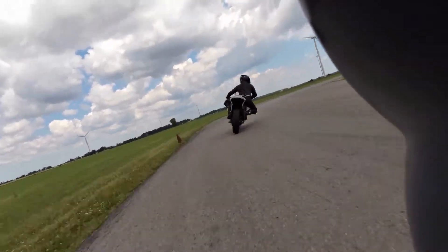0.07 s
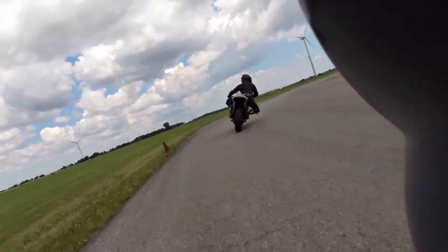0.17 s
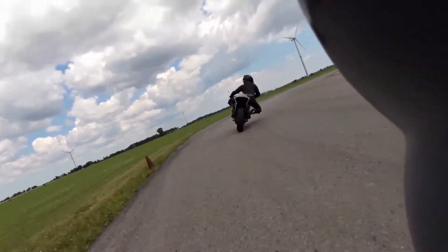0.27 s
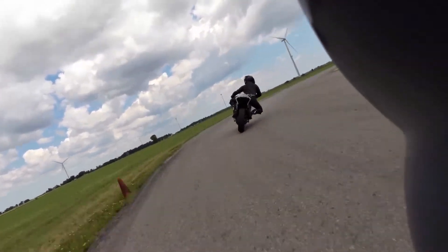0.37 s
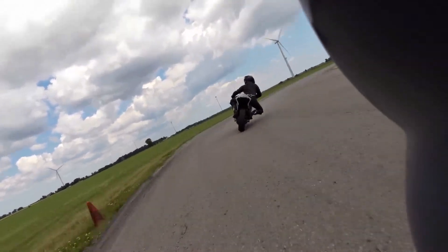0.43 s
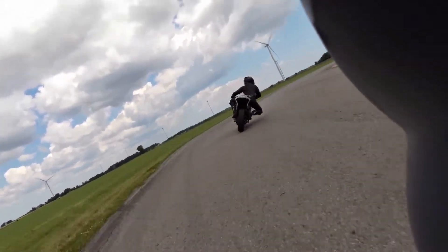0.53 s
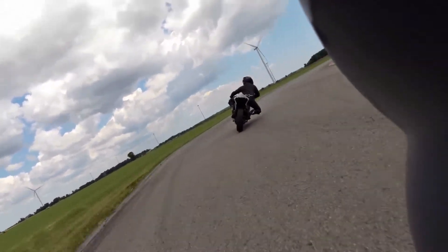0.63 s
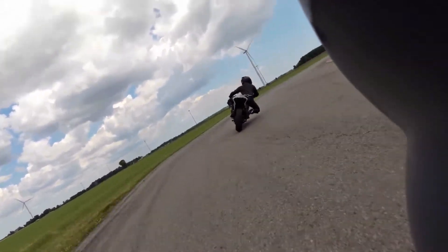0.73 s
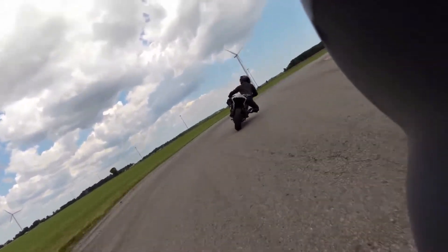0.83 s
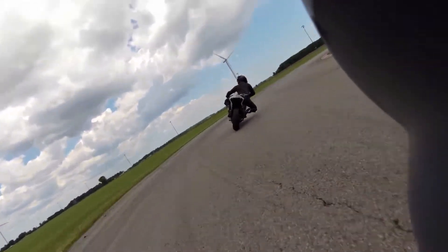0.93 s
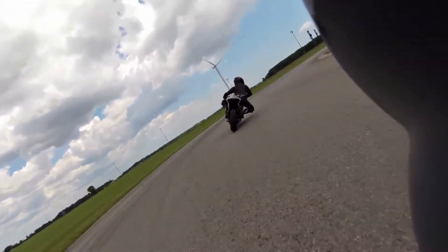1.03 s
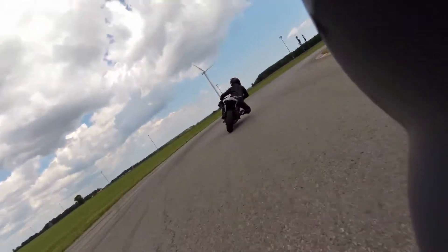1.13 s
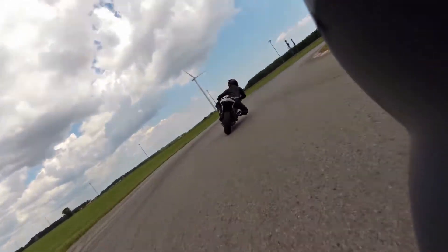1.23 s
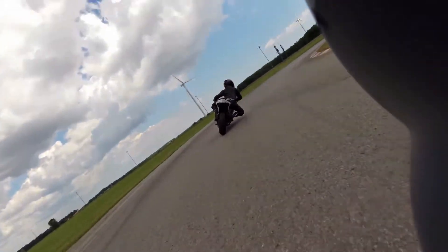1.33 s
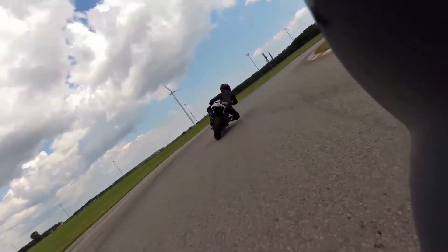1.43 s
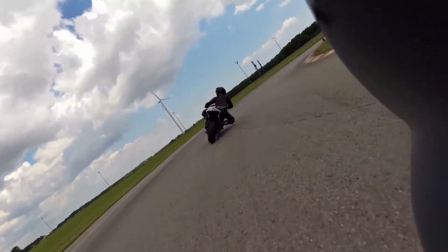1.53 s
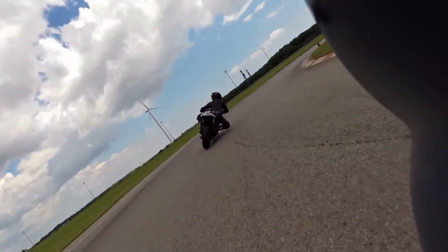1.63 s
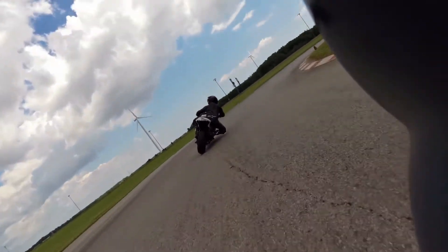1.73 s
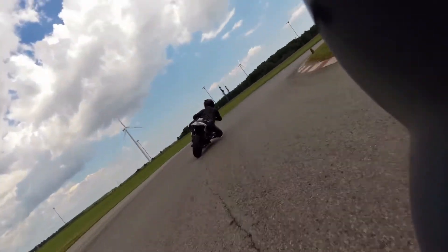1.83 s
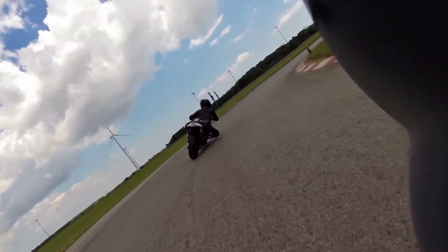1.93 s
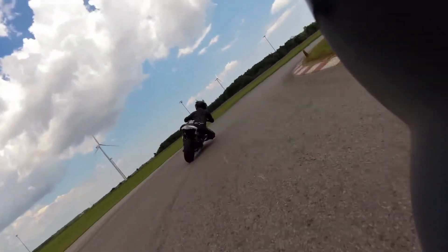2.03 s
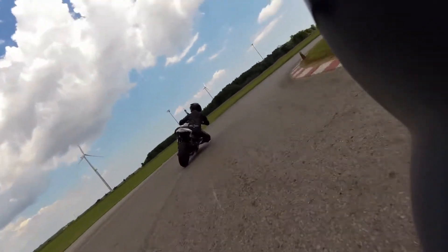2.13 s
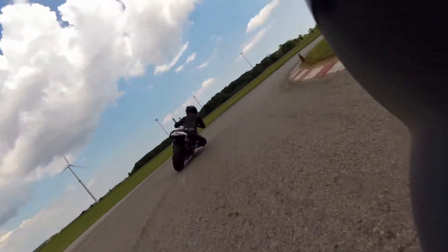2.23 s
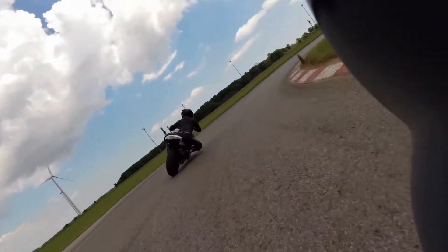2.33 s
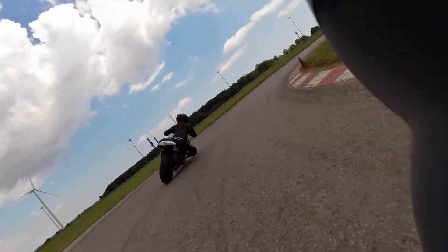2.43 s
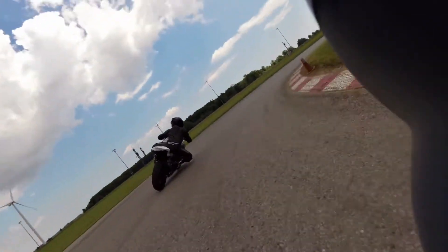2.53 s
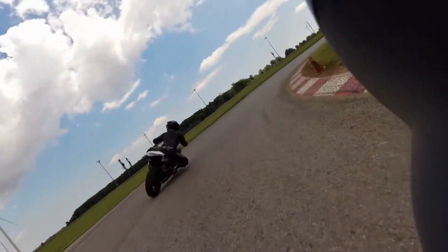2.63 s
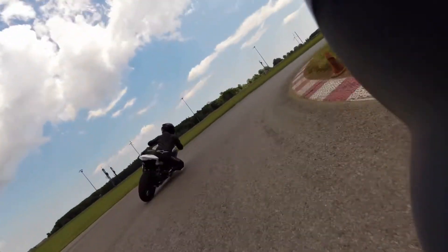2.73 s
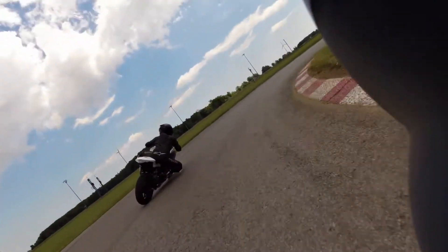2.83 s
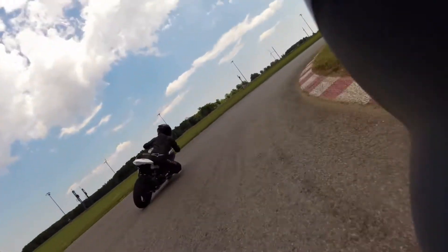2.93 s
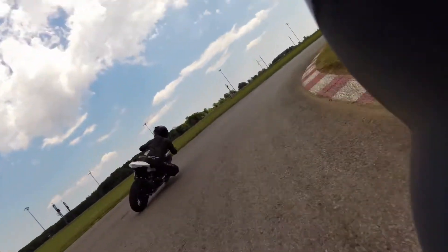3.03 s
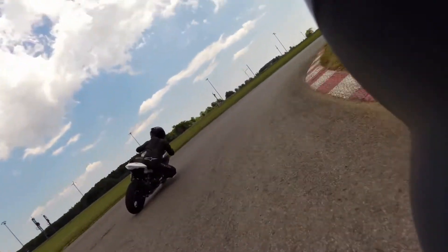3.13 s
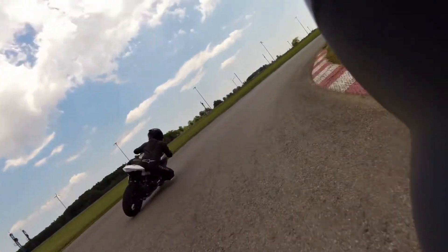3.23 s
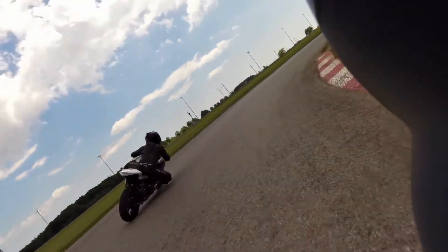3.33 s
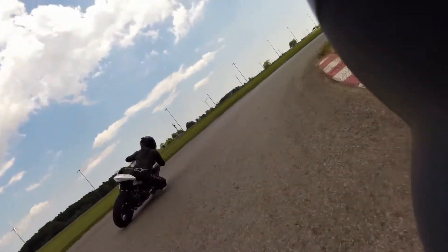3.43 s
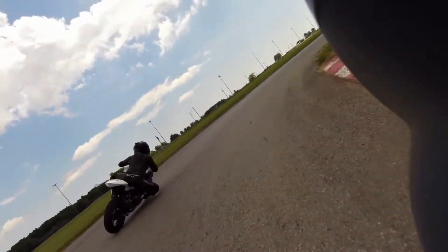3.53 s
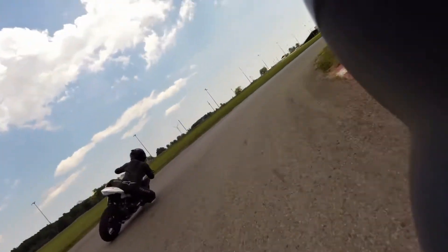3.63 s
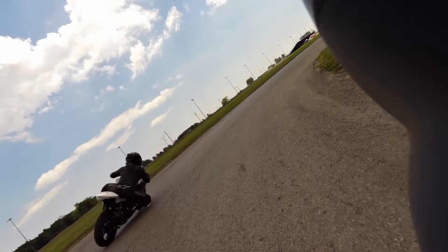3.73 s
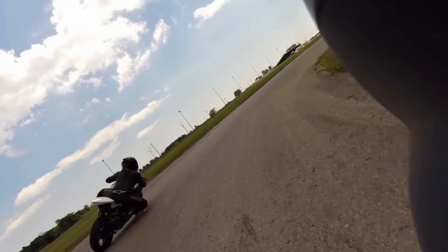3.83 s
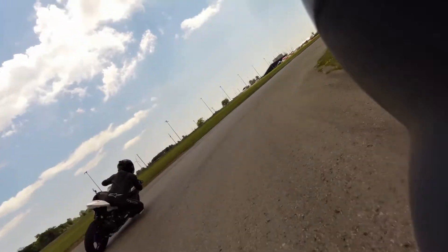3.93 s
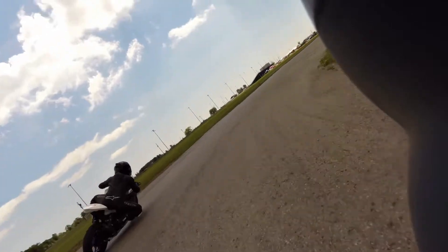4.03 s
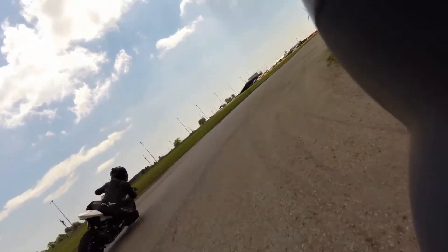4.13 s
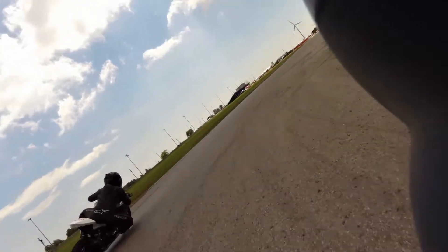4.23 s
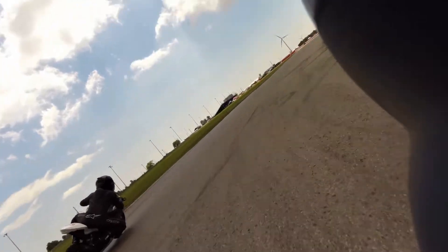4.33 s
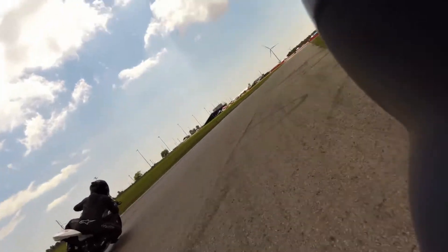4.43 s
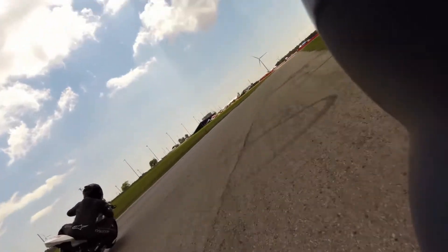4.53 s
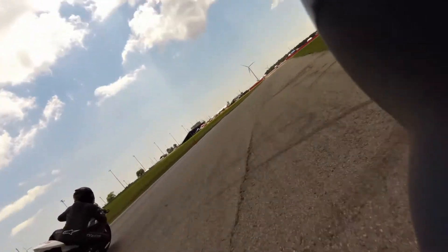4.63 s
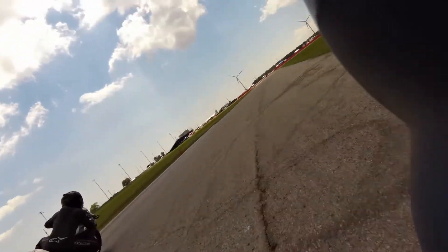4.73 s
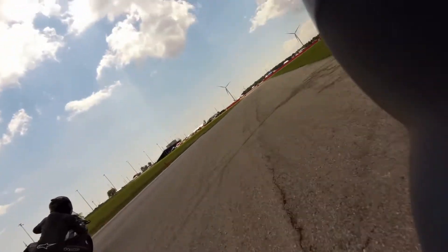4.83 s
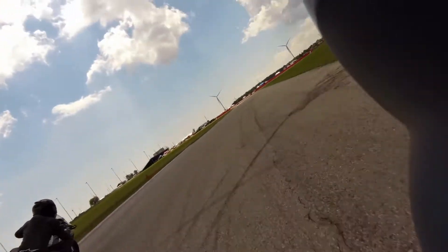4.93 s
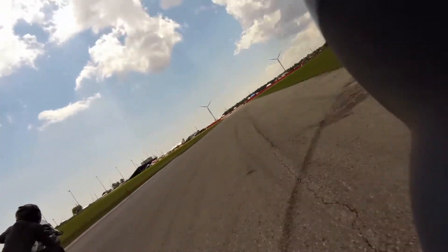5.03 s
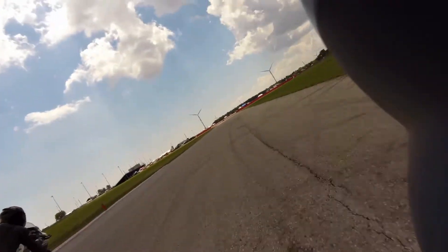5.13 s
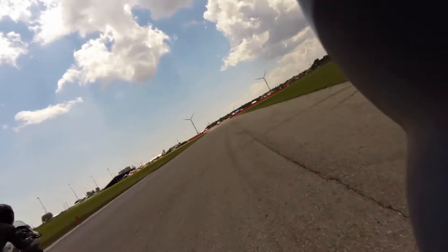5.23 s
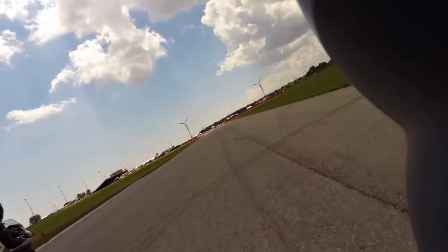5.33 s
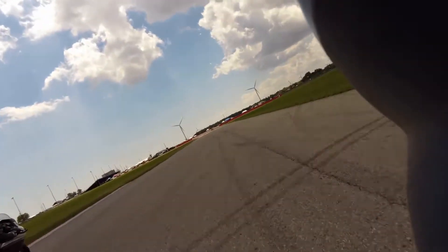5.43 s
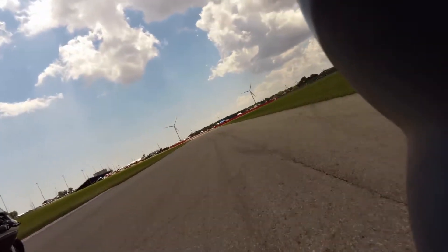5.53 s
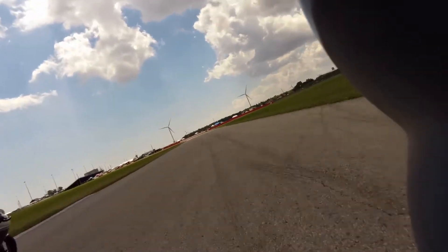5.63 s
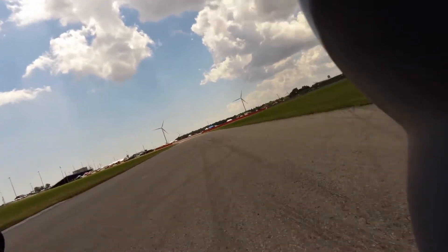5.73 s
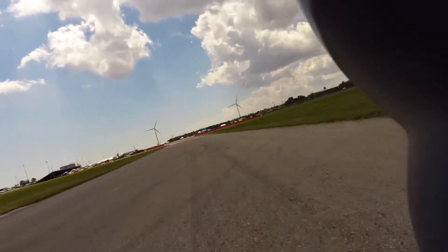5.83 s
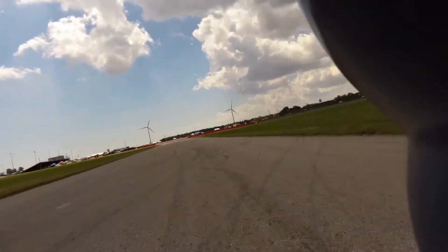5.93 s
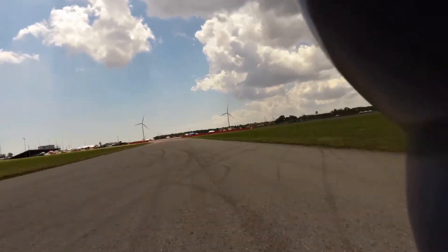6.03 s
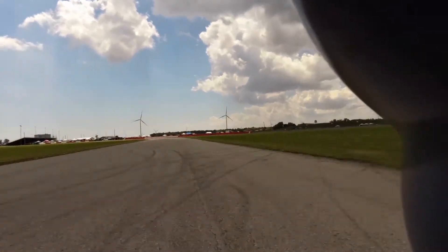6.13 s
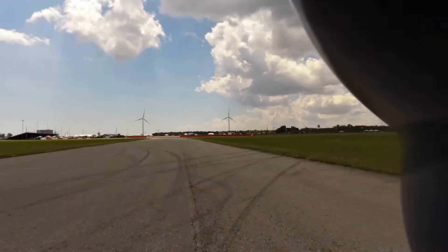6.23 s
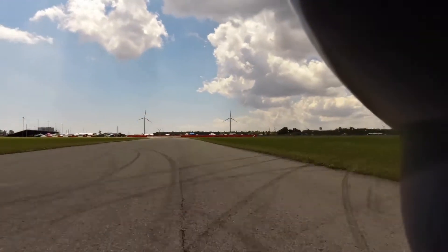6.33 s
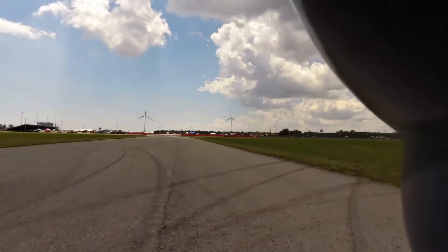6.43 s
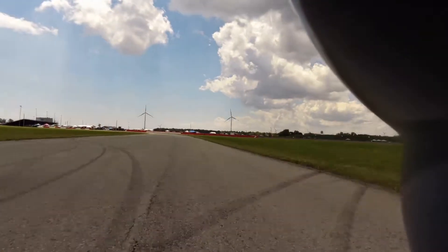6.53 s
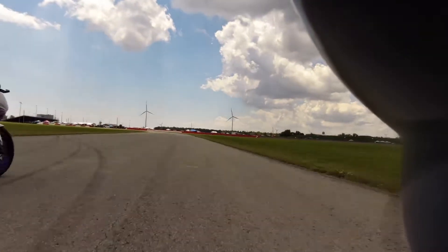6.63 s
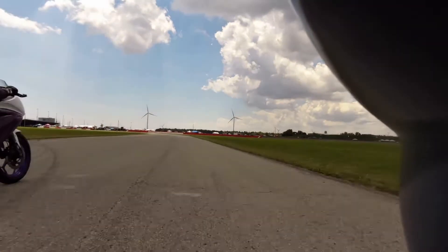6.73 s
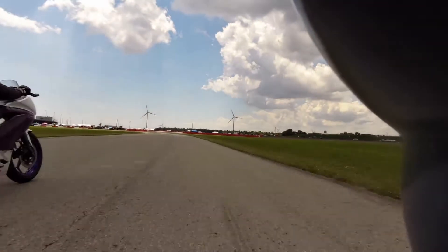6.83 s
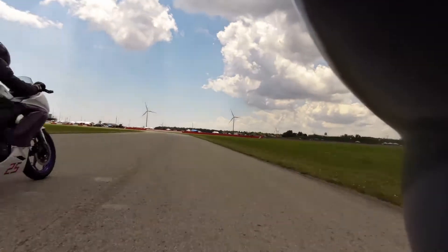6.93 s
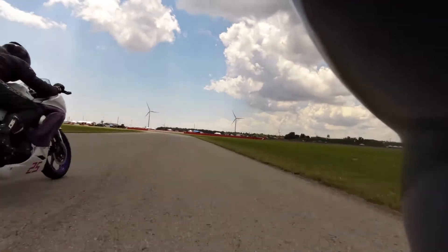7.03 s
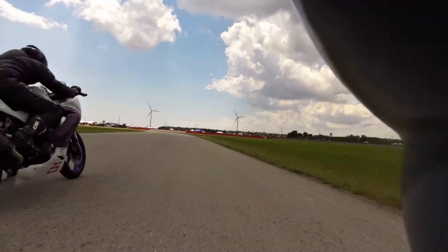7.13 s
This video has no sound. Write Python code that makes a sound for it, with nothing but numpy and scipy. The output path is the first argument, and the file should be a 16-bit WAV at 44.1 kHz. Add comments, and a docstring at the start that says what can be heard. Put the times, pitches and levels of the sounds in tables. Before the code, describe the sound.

A sport motorcycle drones and buzzes into a bend, eases off burbling, then accelerates with a rising howl through growing wind as another bike pulls alongside.

```python
"""Sport bike through a long bend

A four-cylinder sport bike rolls off into a bend and accelerates out of it, heard on its fairing.
Engine, intake and gears are sums of tones locked to the firing rate and shaped by resonances.
The microphone housing buzzes in struck resonances, bumps knock its mount, and a second bike pulls alongside.
Coloured noise makes road rumble and growing wind; pressure crests add a ticking rasp."""
import sys
import numpy as np
from scipy import signal
from scipy.fft import rfft, irfft, next_fast_len
from scipy.io import wavfile
from scipy.ndimage import uniform_filter1d

SR = 44100
rng = np.random.default_rng(int(sys.argv[2]) if len(sys.argv) > 2 else 0)


def to_wav(sig):
    """Store sig (one row per channel, or 1-D mono) as 16-bit WAV at the path in sys.argv[1].

    Samples outside -1..1 are clipped; the rate is SR.
    """
    pcm = np.clip(np.atleast_2d(sig), -1, 1) * 32767
    pcm = np.round(pcm).astype(np.int16)
    wavfile.write(sys.argv[1], SR, pcm.T)  # frames by channels


N = 316638
TIME = np.arange(N) / SR  # s
CRUISE_HZ = 230  # firing rate at which the buzz and howl levels are set
FRAME_LAG = .035  # further delay of each higher harmonic in the frame, share of a firing period


def from_db(db):
    """Decibels to gain."""
    return 10 ** (np.asarray(db) / 20)


def rms_one(x):
    """Scale to unit power."""
    return x / np.sqrt(np.mean(x ** 2) + 1e-20)


def in_time(rows):
    """Each column of a curve, interpolated at every sample."""
    s, *columns = np.transpose(rows)
    return [np.interp(TIME, s, c) for c in columns]


def drift(rate):
    """Slow random wander with spread 1: noise smoothed by two equal poles at rate [Hz]."""
    step = 40  # samples between control points
    r = np.exp(-2 * np.pi * rate * step / SR)
    settle = 2000  # control points dropped while the filter settles
    steps = rng.standard_normal(N // step + settle + 2)
    slow = signal.lfilter([1], [1, -2 * r, r * r], steps)[settle:]
    return np.interp(np.arange(N) / step, np.arange(len(slow)), rms_one(slow))


def noise(spectrum):
    """Noise of rms 1 coloured by (frequency [Hz], density [dB per Hz]), dropping away beyond the ends."""
    size = next_fast_len(N)
    hz, db = np.transpose(spectrum)
    bins = np.arange(size // 2 + 1) * SR / size + 1e-3
    gain = from_db(np.interp(np.log(bins), np.log(hz), db, left=-90, right=-90))
    white = rng.standard_normal(size)
    return rms_one(irfft(rfft(white) * gain, size)[:N])


def resonate(x, hz, width):
    """A two-pole resonance with gain 1 on top."""
    r = np.exp(-np.pi * width / SR)
    zeros = np.array([1, 0, -1]) * (1 - r * r) / 2
    poles = [1, -2 * r * np.cos(2 * np.pi * hz / SR), r * r]
    return signal.lfilter(zeros, poles, x + 1e-18)


def response(hz, resonances):
    """Power of a tone at hz through bell-shaped resonances (centre [Hz], width [Hz], level [dB])."""
    power = 0
    for centre, width, db in resonances:
        power = power + from_db(db) ** 2 * .5 ** ((2 * (hz - centre) / width) ** 2)
    return power


def line(turns, multiple, flutter, rate):
    """One tone locked to the turns, wavering in strength and phase."""
    angle = 2 * np.pi * multiple * turns
    in_phase = (1 + flutter * drift(rate)) * np.cos(angle)
    quadrature = flutter * drift(rate) * np.sin(angle)
    return np.sqrt(2) * (in_phase + quadrature)


def firing_levels(firing_hz, throttle, shut, bursts):
    """Nominal dB of each firing harmonic: it swells in body resonances and when the housing shakes."""
    # resonances of the bike: (centre [Hz], width [Hz], level [dB], gain at full throttle [dB])
    body_modes = [(168.7, 7.9, -8.5, -8), (190, 29, -33.5, 13.5), (222.1, 23.5, -7.5, -1.5),
                  (246, 49, -14.5, 2.5), (386, 63, -13.5, -18.5), (497.4, 70, -19.5, 5.5),
                  (599.6, 37.7, -12.5, -22), (775, 33, -35, 6), (827, 140, -19.5, -16.5)]
    # lift of firing harmonics 1 to 4 in a hard burst: (lift [dB] for each)
    shake_lift = (7.1, 3.6, 5.5, 6.6)
    full_shake_db = -24.5  # a burst this strong gives the whole lift
    floor_db, floor_db_per_octave = -32.5, -3.5  # harmonics away from any resonance
    shut_db = -11.5  # level change on a shut throttle

    body = [(hz, width, db + open_db * throttle) for hz, width, db, open_db in body_modes]
    shaking = uniform_filter1d(np.minimum(bursts / from_db(full_shake_db), 1), size=SR // 10)
    levels = []
    for k, lift_db in enumerate(shake_lift, 1):
        floor = from_db(floor_db + floor_db_per_octave * np.log2(k)) ** 2
        power = response(k * firing_hz, body) + floor
        levels.append(10 * np.log10(power) + shut_db * shut + lift_db * shaking)
    return levels


def engine(turns, harmonic_db, shut):
    """Firing harmonics, burbling on a shut throttle, with weak lines between as the cylinders differ."""
    # higher orders: (multiple of the firing rate, level against the nominal fourth harmonic [dB])
    overtones = [(5, -14), (6, -20), (7, -29)]
    # lines between harmonics: (multiple of the firing rate, level against the nominal third [dB])
    uneven_levels = [(.75, -20.5), (1.25, -19), (2.25, -20), (2.75, -23), (3.25, -18.5), (3.5, -27.5),
                     (3.75, -16), (4.25, -18.5), (4.5, -22), (6, -27)]
    firing_flutter, burble = .19, .45  # unevenness of the firing, and what a shut throttle adds

    unsteady = firing_flutter + burble * shut
    out = np.zeros(N)
    for k, db in enumerate(harmonic_db):
        out += from_db(db - 3.0) * line(turns - FRAME_LAG * k, k + 1, flutter=unsteady, rate=14)
    for k, db in overtones:
        out += from_db(harmonic_db[3] + db) * line(turns, k, flutter=0.64, rate=10)
    multiples, levels_db = np.transpose(uneven_levels)
    for quarter in range(3, 24):
        if quarter % 4:  # skip the firing harmonics themselves
            k = quarter / 4
            db = np.interp(k, multiples, levels_db)
            out += from_db(harmonic_db[2] + db) * line(turns + rng.random(), k, flutter=0.39, rate=12.0)
    return out


def intake(turns, firing_hz, throttle):
    """Air gulped through the open throttle howls where harmonic 4 or 5 meets an airbox resonance."""
    # airbox resonances: (centre [Hz], width [Hz], level at full throttle and cruising rate [dB])
    airbox_modes = [(823, 100, -22.5), (956, 67, -29.5), (1045, 52, -31), (1196, 130, -30.5)]
    howl_db_per_hz = 0.1054  # growth with the firing rate
    howl_wander = .028  # spread of the timing, share of a firing period

    wavering = turns + howl_wander * drift(7)
    flow = throttle * from_db(howl_db_per_hz * (firing_hz - CRUISE_HZ))
    howl = 0
    for k in (4, 5):
        gain = np.sqrt(response(k * firing_hz, airbox_modes))
        howl = howl + gain * line(wavering - FRAME_LAG * (k - 1), k, flutter=.45, rate=22)
    return flow * howl


def road():
    """Tyre rumble through the frame, as steady low noise."""
    # rumble colour: (frequency [Hz], density [dB per Hz])
    rumble_colour = [(20, -37.5), (35, -11.5), (55, 9), (80, -0.5), (130, -21.5)]
    return from_db(-45.5) * noise(rumble_colour)


def wind(drone, firing_hz):
    """Large eddies thump and smaller ones rush; the hiss crackles on the strongest pressure swings."""
    # wind at the microphone: (time [s], buffeting level [dB], rush level [dB])
    wind_levels = [(0, -23.5, -18), (.65, -26, -24.5), (1.15, -26, -22.5), (2.1, -20.5, -18.5),
                   (3.25, -17.5, -21), (3.75, -21, -23), (4.7, -16, -14.5), (5.7, -14, -13),
                   (7.18, -12.5, -9.5)]
    # hiss growing with the firing rate: (firing rate [Hz], level [dB])
    hiss_levels = [(168, -37), (192, -32), (205, -29), (215, -27.5), (260, -23)]
    # gusts that thump: (time [s], level added to the buffeting [dB])
    gust_times = [(3.28, 0), (5.398, 0.5), (5.902, 1.5), (6.349, 1.5)]
    # colours of the three layers: (frequency [Hz], density [dB per Hz])
    buffet_colour = [(25, -48), (50, -25.5), (68, -8), (115, -2.5), (160, -2), (230, -7), (400, -29)]
    rush_colour = [(110, -13.5), (200, 4), (320, 5.5), (480, 2), (700, -2), (950, -3), (1300, -24),
                   (2000, -34.5), (3000, -50)]
    hiss_colour = [(700, -16), (1200, 7), (1700, 0.5), (2050, -5), (2500, -7), (3200, -14.5), (3900, -10.5),
                   (4500, -17.5), (5200, -24), (6200, -50)]
    gust_s = 0.17  # from a gust's height until its added dB fall to 1/e

    buffet_db, rush_db = in_time(wind_levels)
    hiss_db = np.interp(firing_hz, *np.transpose(hiss_levels))
    thumps_db = sum(db * np.exp(-((TIME - s) / gust_s) ** 2) for s, db in gust_times)
    gust, spurts = drift(33), drift(220)
    buffet = from_db(buffet_db + thumps_db + 1.1 * gust) * noise(buffet_colour)
    rush = from_db(rush_db + 0.84 * gust + 0.67 * spurts) * noise(rush_colour)
    swing = np.clip(buffet + rush + 1.3 * drone, 0, 1.2)
    crackle = 1 + 2.2 * swing ** 2
    # even out the slow level so that only the crackling remains
    crackle /= np.sqrt(uniform_filter1d(crackle ** 2, size=SR // 5))
    hiss = from_db(hiss_db + 0.85 * gust + 0.6 * spurts) * crackle * noise(hiss_colour)
    return buffet + rush + hiss


def ticks(pressure):
    """High crests of engine drone and wind overdrive the microphone with sharp ticks: a rasp."""
    # the rasp swells as the engine takes up full load: (time [s], level added to the ticks [dB])
    rasp_levels = [(4.55, -3.5), (4.69, 9), (4.735, 2), (4.79, 6.5), (4.9, 2)]
    tick_db, crest_above, spread_db = -41, 0.46, 2.5  # base level, crest height that ticks, unevenness
    band_hz = (1530, 3100)

    at, _ = signal.find_peaks(pressure, distance=SR // 400)
    excess = np.clip(pressure[at] - crest_above, 0, .5)
    force = excess * from_db(spread_db * rng.uniform(-1.1, 1, len(at)))
    band = signal.butter(2, band_hz, "band", fs=SR, output="sos")
    rasp = signal.sosfilt(band, np.bincount(at, force, N) + 1e-18)
    return from_db(tick_db + in_time(rasp_levels)[0]) * rms_one(rasp)


def gears(turns, firing_hz):
    """The transmission whines where an order meets a resonance of its case, loudest in the slow part."""
    # how loud the gears sing: (time [s], level [dB])
    whine_levels = [(0, -26.5), (2.4, -11.5), (2.85, -2.5), (3.65, -6), (4.05, 5.5), (4.25, -34)]
    # gear-case resonances: (centre [Hz], width [Hz], level [dB])
    case_modes = [(840, 53, -37), (1480, 190, -43), (1790, 200, -51)]
    # whine orders: (multiples of the firing rate)
    gear_orders = (5, 8.4, 10.5)

    level_db, = in_time(whine_levels)
    whine = 0
    for k in gear_orders:
        whine = whine + np.sqrt(response(k * firing_hz, case_modes)) * line(turns, k, flutter=.5, rate=9)
    return from_db(level_db) * whine


def rival():
    """The other bike's exhaust, scattered by turbulent air; its colour shifts from ahead to alongside."""
    # engine speed: (time [s], cycle rate [Hz])
    rival_revs = [(0, 50), (2.6, 47.7), (4, 53.4), (4.75, 57.8), (5.85, 66.8), (6.7, 72.9), (7.18, 70.6)]
    # loudness of the whole bike: (time [s], level [dB])
    rival_levels = [(0, -58), (2.6, -41), (3.4, -32), (4.2, -32), (4.9, -28.5), (5.6, -29), (6.5, -26),
                    (7.18, -30.5)]
    # exhaust lines: (multiple of the cycle rate, level ahead [dB], level alongside [dB])
    exhaust_orders = [(4, 3.5, 1.5), (5, 0.5, -3.5), (6, -8, 0), (8, 2, -3.5), (9, -5.5, 1),
                      (10, -10.5, 2.5), (11, -9, -11), (12, -3, -13.5), (13, -6, -21)]
    # exhaust resonances: (centre [Hz], width [Hz], level against the plain lines [dB])
    pipe_modes = [(472, 67, 6.5), (582, 36, 2)]

    cycle_hz, = in_time(rival_revs)
    level_db, = in_time(rival_levels)
    cycles = np.cumsum(cycle_hz) / SR
    alongside = np.interp(TIME, [4.1, 5.2], [0, 1])
    out = 0
    for k, ahead_db, beside_db in exhaust_orders:
        pipe = np.sqrt(1 + response(k * cycle_hz, pipe_modes))
        order_db = ahead_db + (beside_db - ahead_db) * alongside
        out = out + pipe * from_db(order_db) * line(cycles, k, flutter=.25, rate=7)
    return from_db(level_db) * out


def chatter_bursts():
    """Strength of the hard chatter; each burst catches, holds briefly and drops out."""
    # bursts: (time of the height [s], length at half amplitude [s], level before the buzz trim [dB])
    chatter_times = [(0.019, 0.038, -30), (0.068, 0.042, -28.5), (0.12, 0.019, -28.5), (0.167, 0.063, -33),
                     (0.235, 0.011, -23), (0.268, 0.054, -28.5), (0.307, 0.032, -29.5),
                     (0.355, 0.047, -24.5), (0.374, 0.019, -26.5), (0.394, 0.023, -26.5),
                     (0.422, 0.035, -23.5), (0.449, 0.018, -26), (0.469, 0.012, -20), (0.497, 0.024, -24.5),
                     (0.542, 0.063, -25), (0.6, 0.083, -22), (0.654, 0.028, -22), (0.7, 0.061, -23.5),
                     (0.734, 0.035, -23.5), (0.766, 0.037, -26.5), (0.811, 0.026, -28.5),
                     (0.842, 0.033, -24.5), (0.878, 0.03, -25.5), (0.924, 0.023, -30.5),
                     (0.955, 0.054, -25.5), (1.036, 0.077, -24), (1.139, 0.095, -27), (1.324, 0.086, -30.5),
                     (1.33, 0.0094, -24), (1.408, 0.067, -22), (1.459, 0.023, -21.5), (1.491, 0.036, -25),
                     (1.525, 0.024, -27), (1.573, 0.038, -24), (1.643, 0.034, -26), (1.685, 0.045, -23.5),
                     (2.058, 0.025, -26), (2.077, 0.019, -24.5), (2.101, 0.02, -24), (2.117, 0.011, -25.5),
                     (2.148, 0.041, -34.5), (2.226, 0.015, -21), (2.244, 0.01, -32), (4.628, 0.014, -28.5),
                     (4.697, 0.032, -31.5), (4.789, 0.05, -31.5)]
    power = 0
    for s, length, db in chatter_times:
        fall = np.minimum(np.abs(2 * (TIME - s) / length) ** 2.6, 20)
        power = power + from_db(db) ** 2 * .25 ** fall
    return np.sqrt(power)


def housing_shake(firing_hz, shut, bursts):
    """A light buzz that grows with the revs, and bursts of hard chatter on top."""
    buzz_db, buzz_db_per_hz, shut_db = -42, 0.204, 1  # at the cruising rate, rise, shut-throttle change
    light_db = buzz_db + buzz_db_per_hz * (firing_hz - CRUISE_HZ) + shut_db * shut
    return np.hypot(bursts, from_db(light_db + 2 * drift(9.7)))


def buzz(turns, shake):
    """The housing strikes its mount just after each firing peak, and more lightly on the rebound."""
    # housing resonances: (centre [Hz], width [Hz], relative level [dB])
    housing_modes = [(826, 540, 16.5), (1070, 730, 12), (1400, 670, 14.5), (2310, 610, 12.5),
                     (3910, 490, 15), (4400, 1500, -15)]
    contact_lag, rebound_db = .12, -9.5  # share of a firing period from peak to contact; rebound force
    jitter_s, scrape_s = 0.00024, 0.000073
    trim_db = -0.5

    half_turn = np.floor(2 * (turns - contact_lag))
    at = np.flatnonzero(np.diff(half_turn) > 0)
    rebound = half_turn[at + 1] % 2
    chance = rng.uniform(-0.91, 1, (len(at), 2 + len(housing_modes)))
    # a light buzz only catches now and then, a hard one hits more evenly
    spread_db = np.interp(20 * np.log10(shake[at]), [-37, -25], [10, 5.3])
    force = from_db(rebound_db * rebound + spread_db * (chance[:, 0] - 1.76))
    at = np.clip(at + (jitter_s * SR * chance[:, 1]).astype(int), 0, N - 1)
    # each contact scrapes for a fraction of a millisecond
    decay = np.exp(-1 / (scrape_s * SR))
    contact = signal.lfilter([1], [1, -decay], np.bincount(at, force, N) + 1e-18)
    scrape = contact * rng.standard_normal(N)
    out = np.zeros(N)
    for k, (hz, width, db) in enumerate(housing_modes):
        clicks = np.bincount(at, force * from_db(2.5 * chance[:, 2 + k]), N) + .1 * scrape
        out -= from_db(db) * resonate(resonate(clicks, hz, width), hz, 3 * width)
    return from_db(trim_db) * shake * rms_one(out)


def knocks():
    """Bumps in the asphalt jolt the mount; a low-pass on each jolt sets how dull it is."""
    # jolts: (time [s], strength [dB], brightness as low-pass cutoff [Hz])
    jolt_times = [(2.6232, -6, 1400), (2.6258, -4, 1500), (2.6292, 2, 900), (2.6324, 5.5, 2900),
                  (2.6342, -2, 1800), (2.636, -7, 2200), (2.688, -1.5, 800), (3.001, 0, 700),
                  (3.274, 1, 650), (3.688, -2, 900), (4.008, -2.5, 850), (5.926, 5.5, 1100)]
    # mount resonances: (centre [Hz], width [Hz], level [dB])
    mount_modes = [(140, 90, -18), (410, 90, -5.5), (780, 160, -3.5), (1350, 380, -7), (2600, 1100, -13.5),
                   (4600, 1600, -15.5)]

    jolts = np.zeros(N)
    for s, db, hz in jolt_times:
        dulling = signal.butter(2, hz, fs=SR, output="sos")
        impulse = np.bincount([int(s * SR)], [from_db(db)], N)
        jolts += signal.sosfilt(dulling, impulse + 1e-18)
    out = np.zeros(N)
    for k, (hz, width, db) in enumerate(mount_modes):
        # neighbouring modes swing in opposite directions, so the thump builds up without a click
        gain = (-1) ** k * from_db(db) * SR / (2 * np.pi * width)
        out += gain * resonate(jolts, hz, width)
    return out


def scene():
    """Revs and throttle drive the bike; one enclosed microphone hears it all, so both channels match."""
    # engine speed, down into the bend and up out of it: (time [s], firing rate [Hz])
    revs = [(0, 216.5), (.25, 208.5), (.45, 203), (.75, 199), (1.5, 195), (2.1, 192.3), (2.4, 187.8),
            (2.65, 184), (2.85, 178), (3.05, 176), (3.45, 168.5), (3.72, 165.5), (3.9, 179), (4.1, 188.5),
            (4.27, 199), (4.5, 207), (4.75, 216), (5.55, 239.5), (5.65, 234.5), (6.25, 245), (6.5, 251),
            (7.18, 261)]
    # the throttle is eased, shut, then opened wide: (time [s], opening [0-1])
    throttle_curve = [(2.1, 0.3), (2.65, 0.02), (3.94, 0), (4.17, 0.94)]
    shut_below = 0.29  # the engine counts as closing below this opening

    firing_hz, = in_time(revs)
    throttle = np.clip(in_time(throttle_curve)[0], 0, 1)
    shut = np.clip(1 - throttle / shut_below, 0, 1)
    bursts = chatter_bursts()
    turns = np.cumsum(firing_hz * (1 + .002 * drift(15))) / SR  # firings so far
    drone = engine(turns, firing_levels(firing_hz, throttle, shut, bursts), shut)
    bike = drone + intake(turns, firing_hz, throttle) + gears(turns, firing_hz)
    air = wind(drone, firing_hz)
    housing = buzz(turns, housing_shake(firing_hz, shut, bursts)) + knocks()
    mono = bike + housing + rival() + road() + air + ticks(drone + air)
    return np.array([mono, mono])


def record(dry):
    """The right side is a little brighter, overload rounds the peaks, and the case muffles the top."""
    muffle_hz, cutoff_hz = 4970, 9500
    high_pass = signal.butter(3, 750, "high", fs=SR, output="sos")
    treble = signal.sosfiltfilt(high_pass, dry)
    x = dry + treble * np.array([[-.08], [.08]])
    x = x / (1 + np.abs(x / 1.01) ** 10) ** (1 / 10)
    x = signal.sosfilt(signal.butter(7, muffle_hz, fs=SR, output="sos"), x)
    return .98 * signal.sosfilt(signal.butter(12, cutoff_hz, fs=SR, output="sos"), x)


dry = scene()
out = record(dry)
to_wav(out)
```